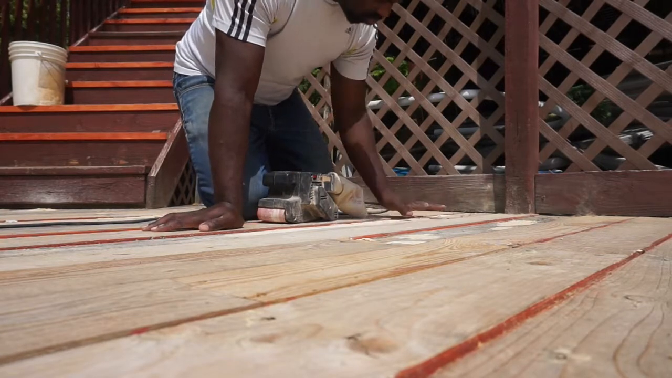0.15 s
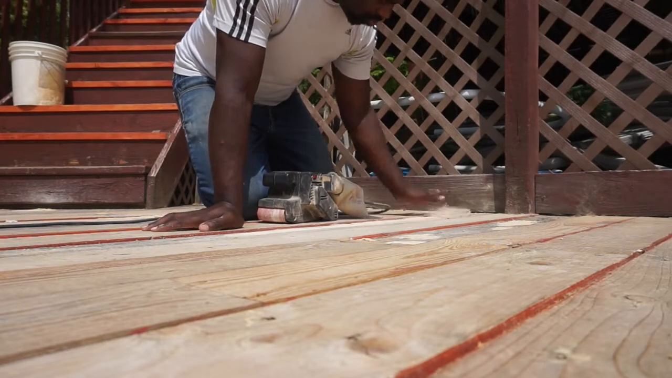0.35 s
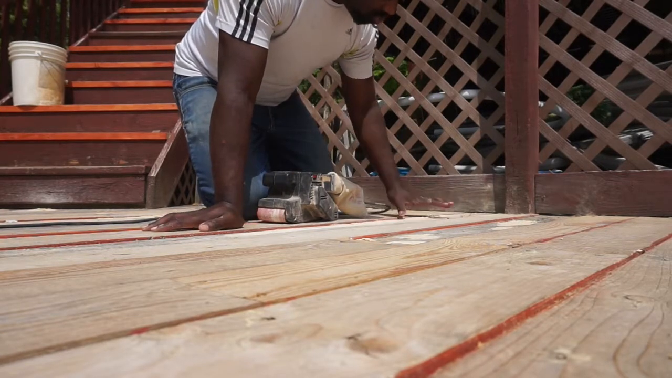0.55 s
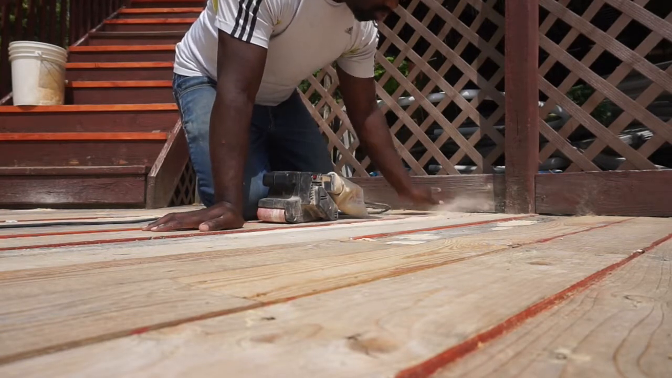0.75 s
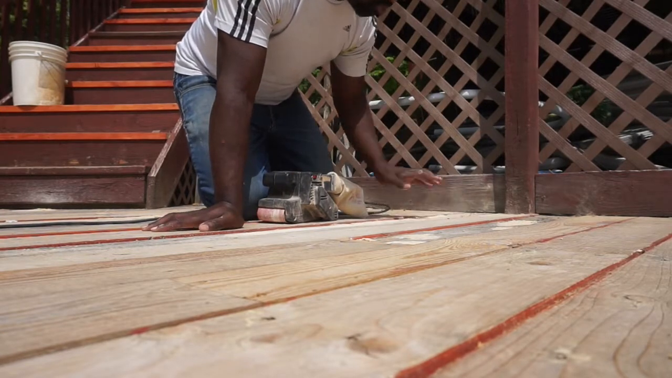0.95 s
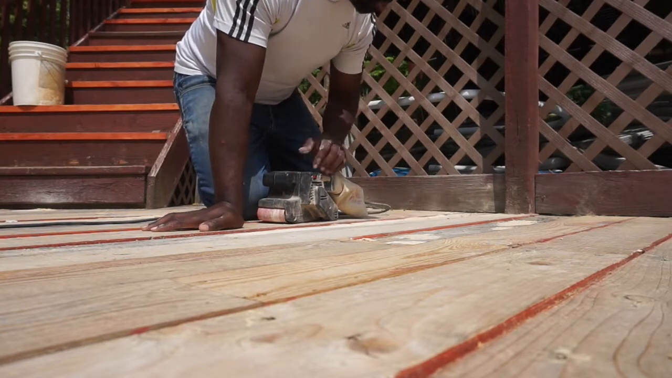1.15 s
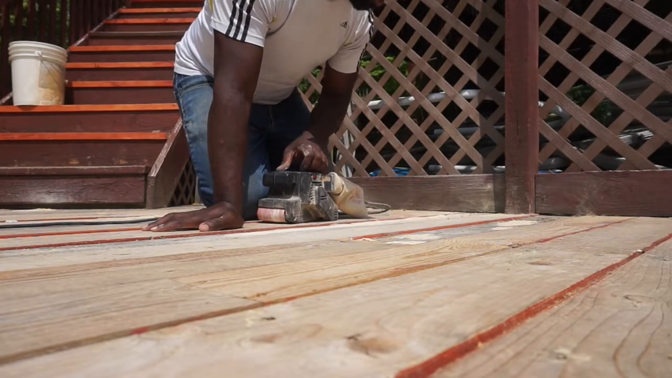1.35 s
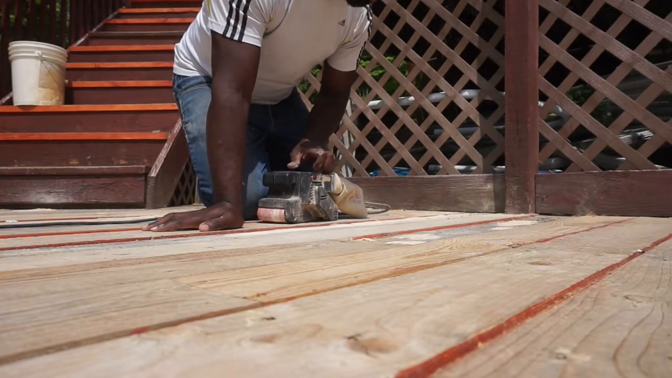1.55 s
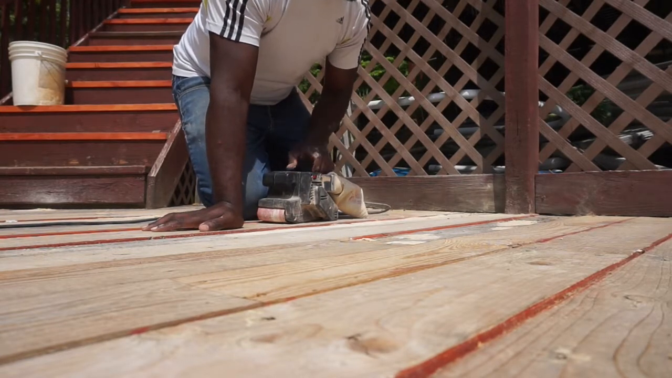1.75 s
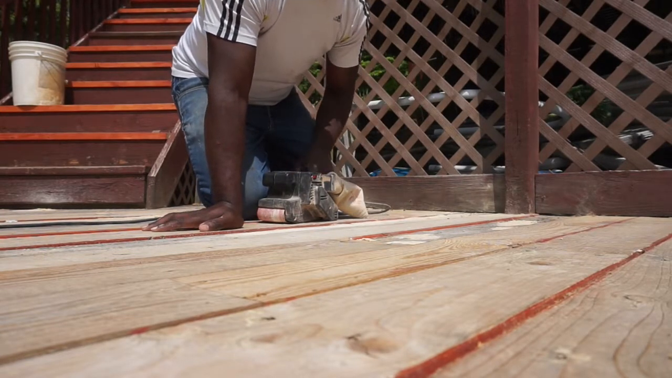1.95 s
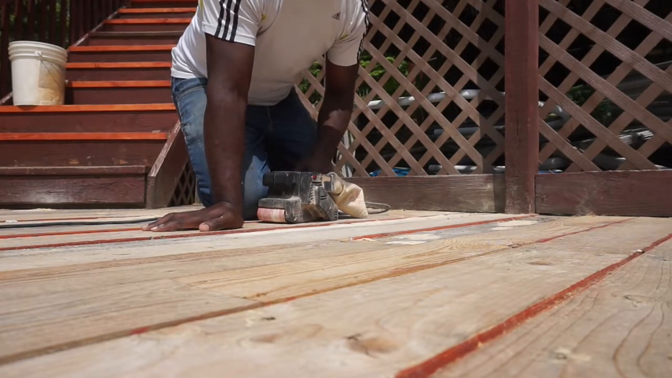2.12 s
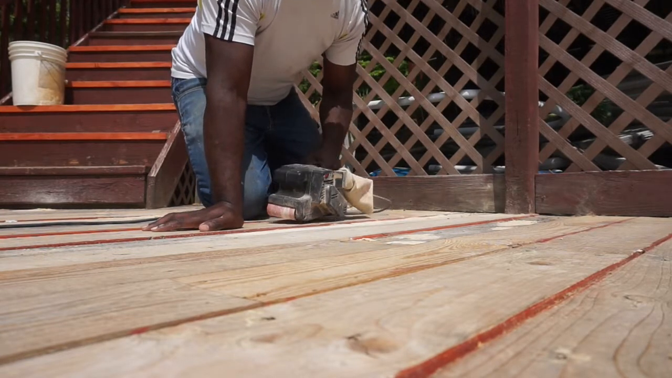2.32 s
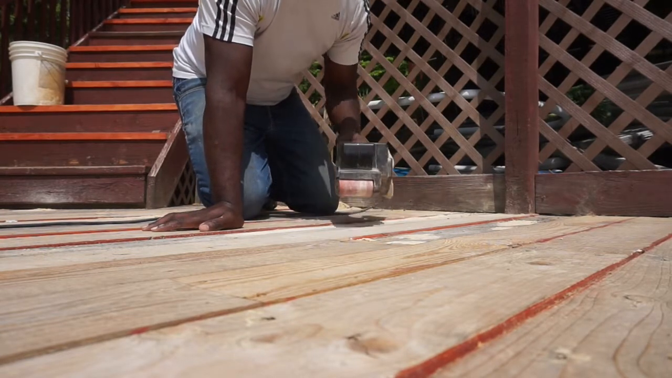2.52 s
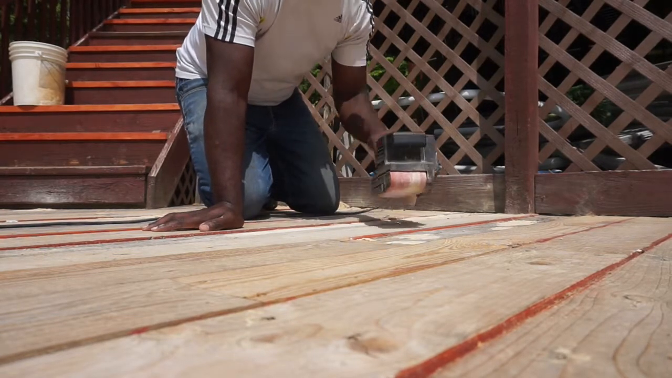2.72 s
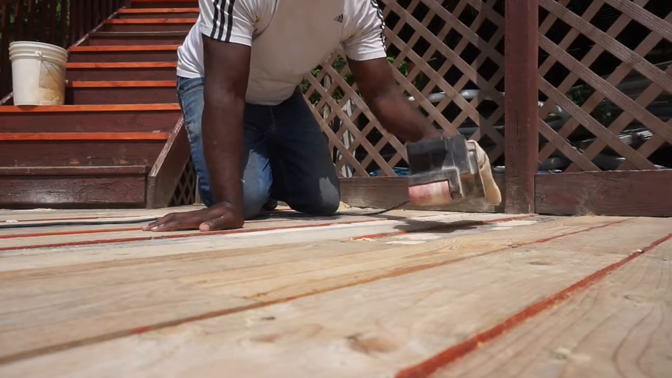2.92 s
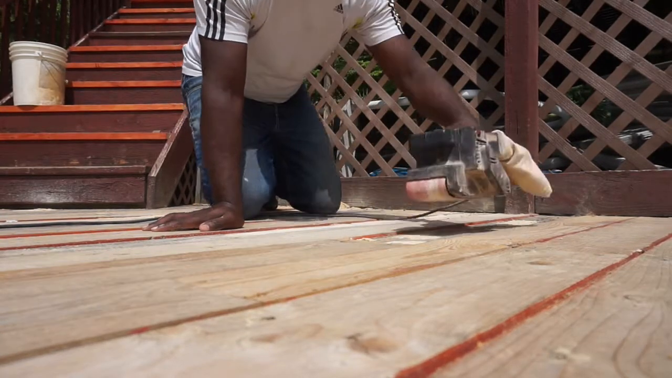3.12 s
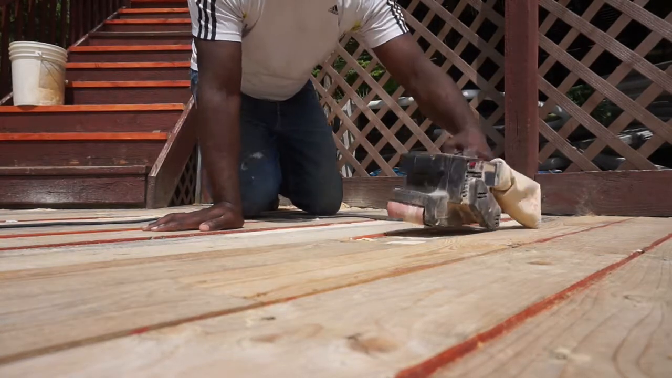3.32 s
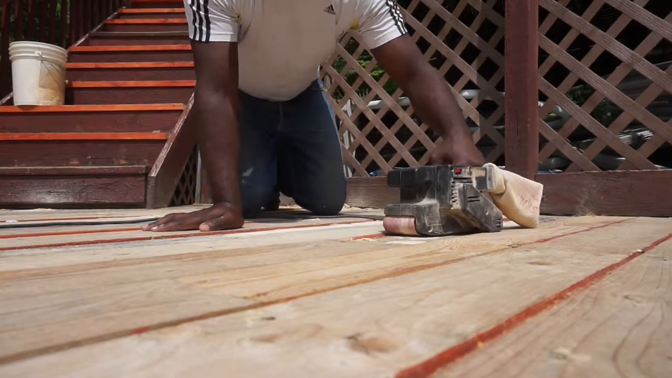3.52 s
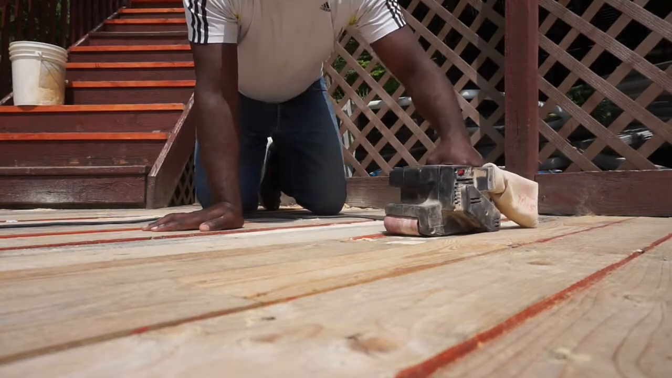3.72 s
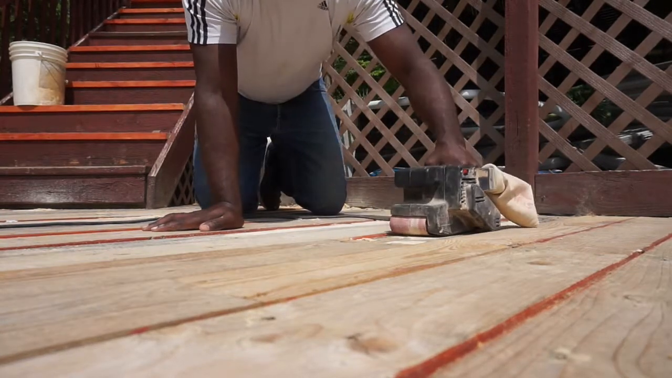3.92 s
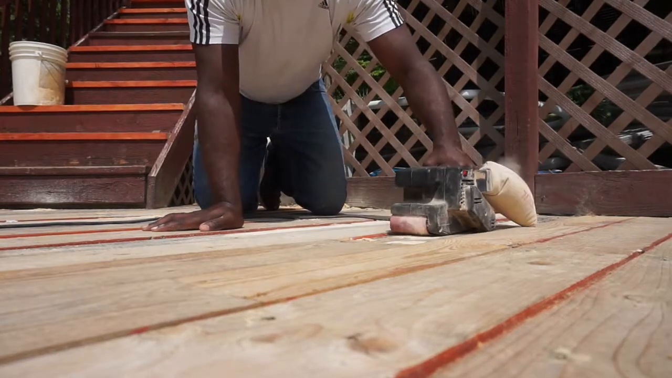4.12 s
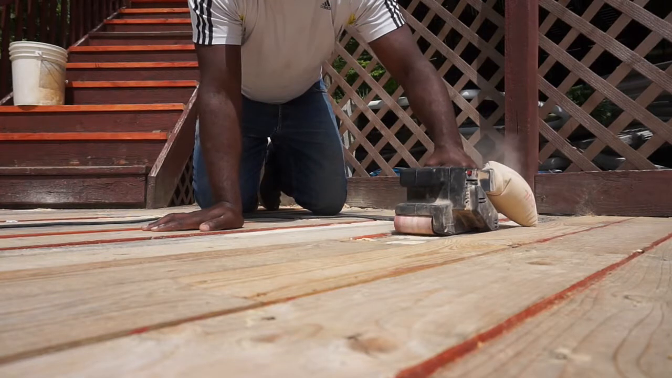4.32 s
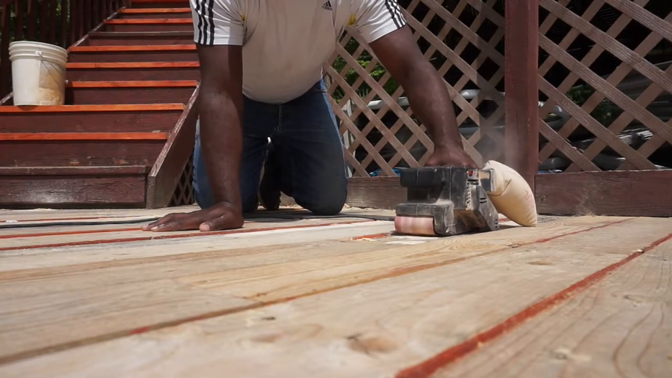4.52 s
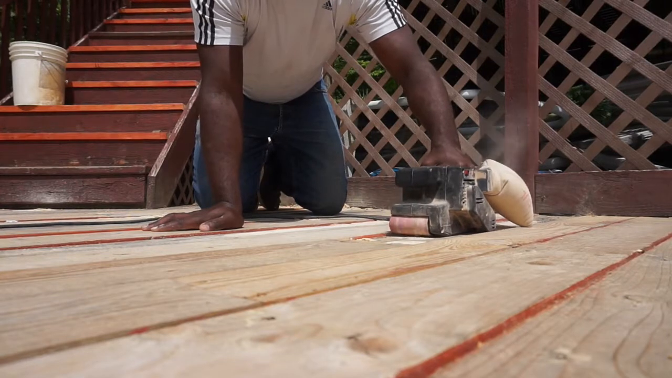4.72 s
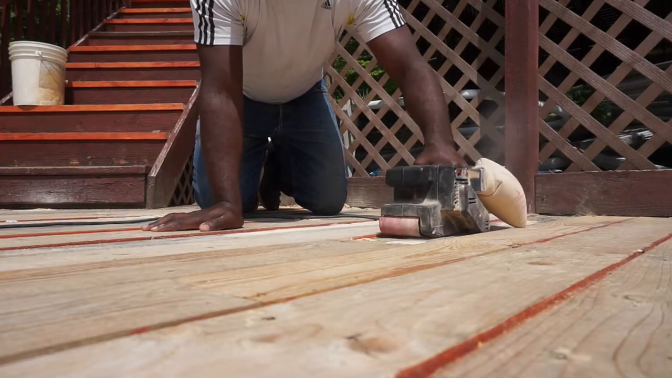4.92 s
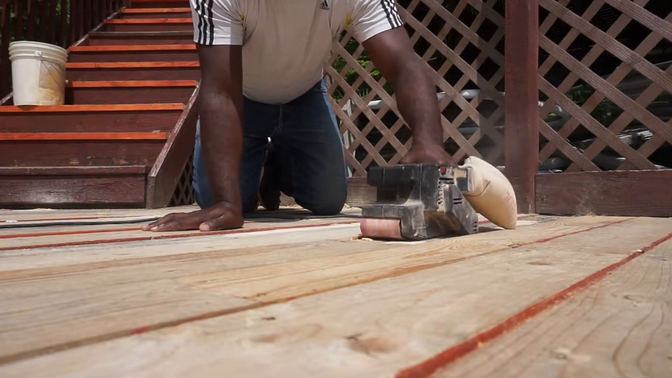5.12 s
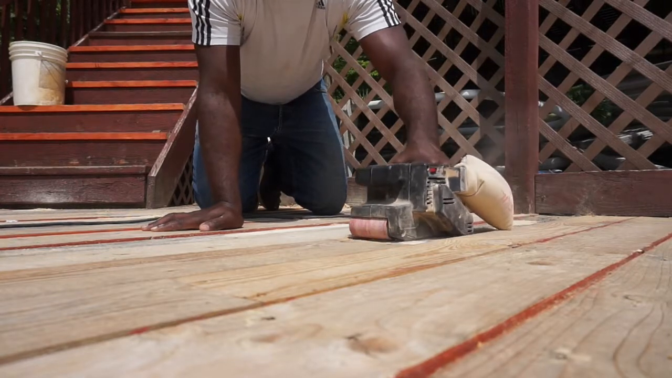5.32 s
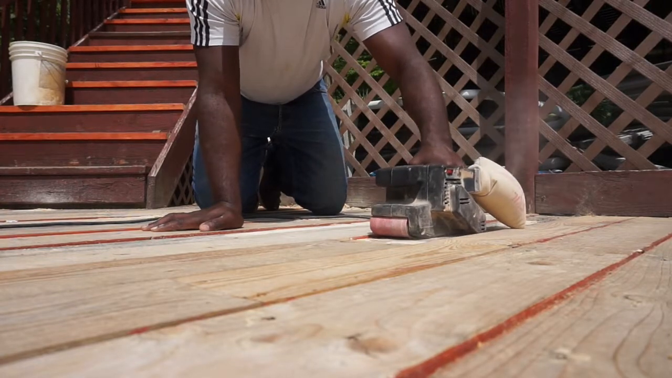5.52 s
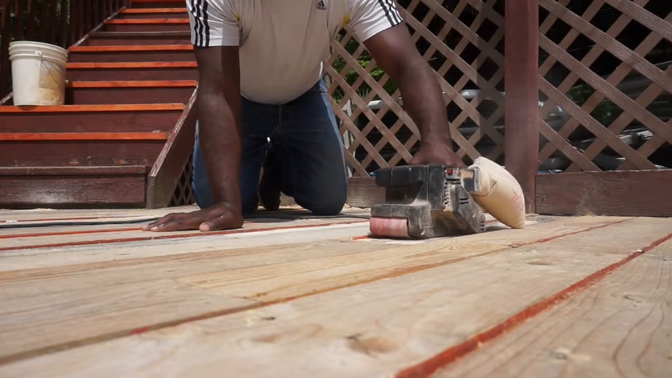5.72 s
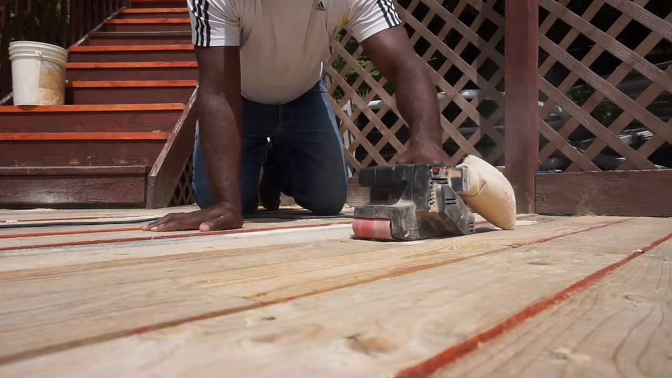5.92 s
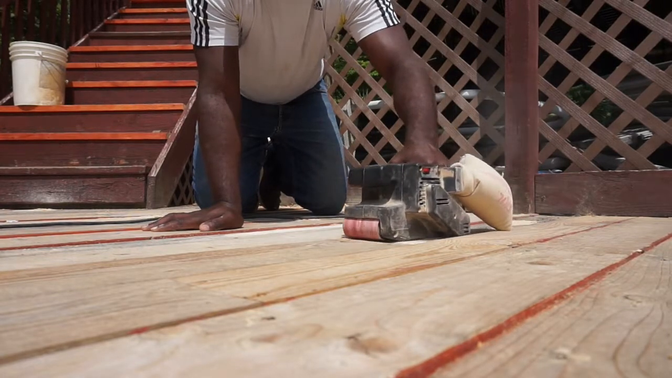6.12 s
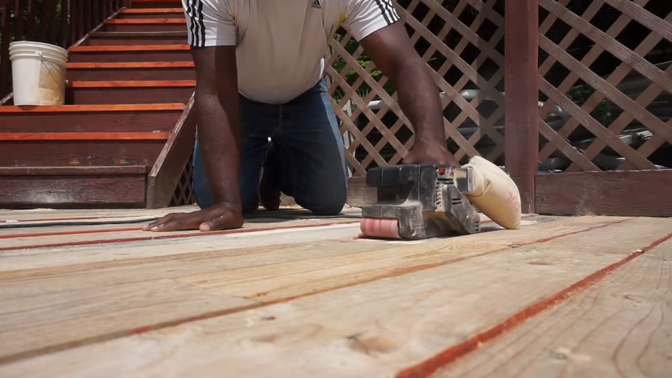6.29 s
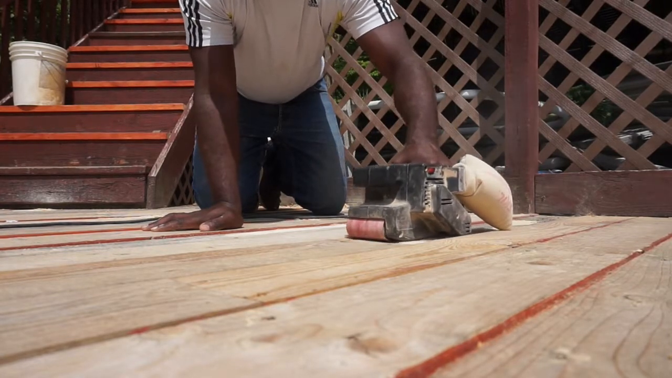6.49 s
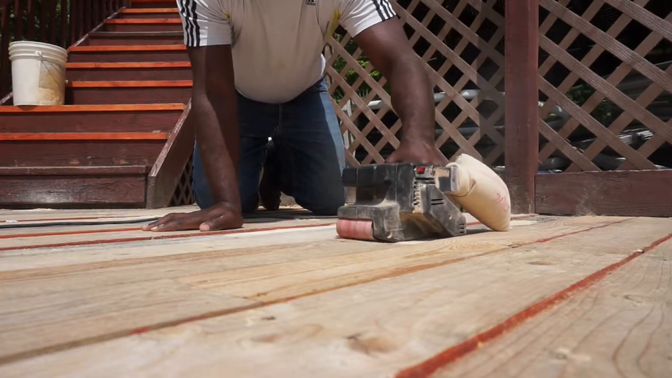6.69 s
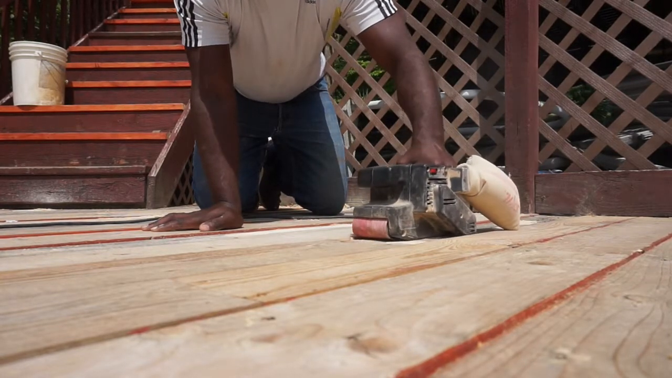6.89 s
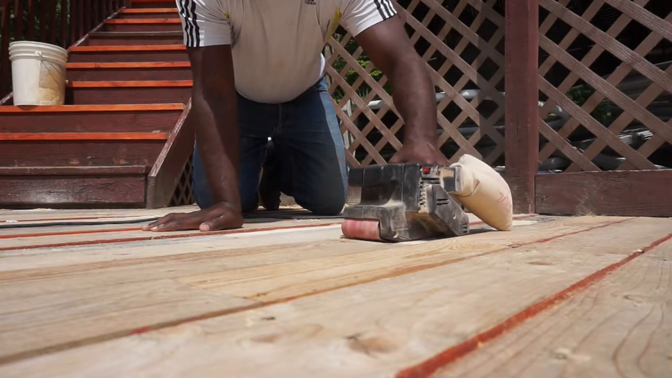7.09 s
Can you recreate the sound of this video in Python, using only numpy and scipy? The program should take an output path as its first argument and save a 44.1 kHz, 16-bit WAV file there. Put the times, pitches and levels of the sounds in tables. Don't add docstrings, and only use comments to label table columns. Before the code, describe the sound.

Cicadas drone in a yard as a hand brushes a wooden deck, a heavy tool thuds down, then a belt sander whines up and rasps.

```python
import sys
import numpy as np
from scipy import signal
from scipy.fft import rfft, irfft
from scipy.io import wavfile
from scipy.ndimage import uniform_filter1d

SR = 44100
rng = np.random.default_rng(int(sys.argv[2]) if len(sys.argv) > 2 else 0)


def put_to_file(sound):
    columns = np.atleast_2d(sound).T
    safe = np.clip(columns, -1, 1)
    whole_steps = np.round(safe * 32767)
    wavfile.write(sys.argv[1], SR, whole_steps.astype(np.int16))


def magnitude_from_level(level_db):
    exponent = np.asarray(level_db, float) / 20
    return 10 ** exponent


N = 315315
TIME, HZ = np.arange(N) / SR, np.fft.rfftfreq(N, 1 / SR)

# frequency [Hz], then likeness [0-1], phase lead [rad] or balance [dB].
YARD_SAME = [(60, .97), (300, .88), (640, .65), (1400, .5), (3100, .3), (6000, .4), (15000, .7)]
YARD_LEAD = [(30, 0), (600, .2), (1380, -.1), (3960, .7), (4820, 2.3), (6290, 2.1), (7670, .3), (15400, 0)]
YARD_PAN = [(60, -2), (240, -0.5), (950, 1), (3770, -1.5), (15000, 1.5)]
YARD_PORTS = (YARD_SAME, YARD_LEAD, YARD_PAN)
# frequency [Hz], then likeness [0-1], phase lead [rad] or balance [dB].
TOOL_SAME = [(60, .98), (500, .95), (2000, .85), (4000, .72), (8000, .5), (11000, .3), (15000, .1)]
TOOL_LEAD = [(30, 0), (2150, -.2), (2580, -.9), (3100, -3.5), (3800, -5.3), (4390, -6.4), (9470, -6.6),
             (10500, -7.1), (15400, -6.8)]
TOOL_PAN = [(60, -20), (130, 34), (290, 1.5), (640, -0.5), (1410, -6), (3100, -7), (6820, -4),
            (15000, -1.5)]
TOOL_PORTS = (TOOL_SAME, TOOL_LEAD, TOOL_PAN)
# time [s], working tooth rate [Hz], push [dB], turn [-1 to 1], lean [-1 to 1].
LOAD = [(4.3, 1267, -33.5, 0.058, -0.48), (4.6, 1279, -29.5, 0.027, 0.29),
        (4.77, 1282, -27.5, -0.013, 0.071), (4.88, 1286, -25.5, 0.12, -0.1),
        (5.0, 1274, -28.5, 0.16, -0.61), (5.18, 1256, -28.5, .4, -0.048), (5.29, 1247, -29, -0.75, 0.32),
        (5.36, 1269, -28.5, -0.18, .1), (5.46, 1250, -27, 0.17, -0.054), (5.6, 1251, -33, -0.15, 0.17),
        (5.85, 1261, -29, 0.16, 0.29), (6.09, 1251, -23.5, 0.048, 0.33), (6.27, 1243, -29.5, -0.28, 0.3),
        (6.41, 1237, -29, 0.82, 0.04), (6.58, 1245, -28.5, -0.47, -.1), (6.78, 1263, -26, -0.98, 0.48),
        (6.97, 1273, -27, -0.26, 0.17), (7.15, 1266, -22.5, 0.021, .1)]

TRIGGER_S = 4.0155


def evened(x):
    return x / np.sqrt(np.mean(np.abs(x) ** 2) + 1e-20)


def read(points, hz):
    f, value = np.transpose(points)
    return np.interp(np.log(hz + 1), np.log(f + 1), value)


def curves(rows):
    s, *columns = np.transpose(rows)
    return [np.interp(TIME, s, c) for c in columns]


def drift(hz):
    return evened(irfft(rfft(rng.standard_normal(N)) / (1 + (HZ / hz) ** 2), N))


def bump(center_s, half_s):
    return np.exp(-0.5 * ((TIME - center_s) / half_s) ** 2)


def ports(tables, hz):
    same, lead, balance_db = (read(table, hz) for table in tables)
    left = magnitude_from_level(balance_db / 2) * np.exp(0.5j * lead)
    pair = np.array([left, 1 / left])
    pair = pair * np.exp(-1j * np.angle(pair.mean(0)))
    return pair / np.maximum(abs(pair.mean(0)), 0.6), np.clip(same, 0, 1)


def grains(per_s, spread_db):
    size_db = spread_db * np.minimum(rng.exponential(1, (2, N)), 5)
    size = magnitude_from_level(size_db) * rng.standard_normal((2, N))
    return size * (rng.random((2, N)) < per_s / SR)


def spread(trains, spectrum, tables, lo_hz, hi_hz):
    pair, same = ports(tables, HZ)
    a, b = rfft(trains)
    shared = np.sqrt((1 + same) / 2) * a
    apart = np.sqrt((1 - same) / 2) * b
    inside = (HZ > spectrum[0][0]) & (HZ < spectrum[-1][0])
    z = pair * np.array([shared + apart, shared - apart]) * magnitude_from_level(read(spectrum, HZ)) * inside
    middle = irfft(z.mean(0) * (HZ > lo_hz) * (HZ < hi_hz), N)
    return irfft(z, N) / middle.std()


def ducking():
    thud_s, thud_db, recover_s, tool_db = 3.395, -11.5, 0.2, -4.5
    since_s = TIME - thud_s
    dip_db = thud_db * np.exp(-np.abs(since_s) / recover_s) * (since_s > 0)
    return uniform_filter1d(dip_db + tool_db * (TIME > TRIGGER_S), size=600)


def yard():
    # frequency [Hz], level [dB per Hz].
    high_song = [(1650, -51), (2800, -29.5), (3140, -21.5), (3920, -6), (4590, -11), (5040, -6),
                 (5810, -0.5), (7050, -13.5), (8140, -16.5), (9320, -27), (11900, -30.5), (15500, -58)]
    low_song = [(530, -30), (900, -23.5), (1060, -19.5), (1320, 1.5), (1360, 0), (1400, 0.5), (1450, -9.5),
                (1670, -24), (2000, -38.5), (2600, -46), (4400, -120)]
    deep_air = [(25, -17), (48, -8), (65, -6.5), (85, -1), (102, 0.5), (125, -9), (250, -12.5), (450, -20),
                (700, -17.5)]
    far_haze = [(300, -26), (500, -26.5), (900, 2.5), (1900, -12.5), (3000, -14), (4000, -33)]
    # time [s], swell [dB].
    swell_rows = [(0, 0), (.7, 1), (1.4, 1), (1.8, 1.5), (2.5, 2), (3.3, 3), (4, 2.5)]
    swell_db, duck_db = curves(swell_rows)[0], ducking()

    high_db = -48 + 0.94 * swell_db + duck_db + 0.2 * drift(23)
    low_db = -42 + swell_db + duck_db + 0.73 * drift(3.3)
    air_db = -59.5 + 2.9 * swell_db + duck_db + 1.6 * drift(6)
    haze_db = -62 + 1.86 * swell_db + duck_db

    high = spread(grains(9000, 0.17), high_song, YARD_PORTS, 4400, 6600) * magnitude_from_level(high_db)
    low = spread(grains(5000, 1.8), low_song, YARD_PORTS, 1240, 1640) * magnitude_from_level(low_db)
    air = spread(rng.standard_normal((2, N)), deep_air, YARD_PORTS, 40, 157) * magnitude_from_level(air_db)
    haze = spread(rng.standard_normal((2, N)), far_haze, YARD_PORTS, 480, 1140) * magnitude_from_level(haze_db)
    return high + low + air + haze


def hand():
    # time [s], level [dB], half length [s].
    sweeps = [
        (.0, -57.5, .03),
        (0.29, -55, 0.021),
        (.672, -58, 0.033),
        (1.23, -75, .015),
    ]
    # frequency [Hz], level [dB per Hz].
    dust = [(2000, -16), (3500, 0), (6000, 7), (9000, -2), (12000, -10), (15500, -21)]
    stroke = sum(magnitude_from_level(db) * bump(s, half_s) for s, db, half_s in sweeps)
    return stroke * spread(grains(7000, 2.1), dust, YARD_PORTS, 7500, 15000)


def knocks():
    # time [s], peak [dB], struck pitch [Hz], tick [dB re peak], hardness [0-1].
    blows = [(1.232, -42, 2500, -30, 0.9), (2.287, -36, 203, -35, 0.3), (2.958, -41, 169.6, -35, 0.6),
             (3.206, -37.5, 84, -50, 0.15), (3.3925, -14, 700, -45, 0.49), (3.4112, -16, 1140, -35, 0.58),
             (3.418, -22, 188, -45, 0.23), (3.44, -29, 1300, -24, 0.9), (3.455, -23.5, 710, -13, 0.53),
             (3.476, -27.5, 447, -40, .35), (3.837, -51, 1300, -30, 1), (4.016, -21.5, 756, -35, 1),
             (4.034, -16.5, 1075, -35, 0.83), (4.051, -31, 910, -30, 0.7), (4.083, -28.5, 224, -30, 0.43),
             (5.294, -27, 123, -17, 0.5), (5.339, -27, 315, -20, 0.57), (5.57, -42, 497, -15, 0.6)]
    # frequency [Hz], level [dB], decay by 60 dB [s].
    deck = [(67.7, -10, 0.26), (95, -2, 0.13), (135, -2.5, 0.16), (217, -5, 0.17), (248, -6, 0.24),
            (335, -7.5, 0.12), (422, -12, 0.3), (509, -13, 0.28), (655, -31, 0.042), (796, -1, 0.05),
            (968, 1, 0.021), (1300, -6, 0.053), (1643, -3, 0.012), (2390, -16, 0.016)]
    t, out = np.arange(SR // 3) / SR, np.zeros(N + SR)
    contact = 1 - np.exp(-t / 0.00036)
    tick_band = signal.butter(4, [6500, 12000], "band", fs=SR)
    wood_band = signal.butter(3, [600, 3000], "band", fs=SR)
    for s, db, hz, tick_db, hard in blows:
        boards = np.zeros(len(t))
        for f, mode_db, t60_s in deck:
            level_chance, pitch_chance, phase_chance = rng.uniform(-1.41, 1, 3)
            hard_db = 20 * (hard - 0.5) * np.log2(f / 300)
            decay_db = mode_db + hard_db + 4.6 * level_chance - 60 * t / t60_s
            phase = 2 * np.pi * f * (1 + 0.077 * pitch_chance) * t + 2.1 * phase_chance
            boards += magnitude_from_level(decay_db) * np.sin(phase)
        struck = 0.85 * magnitude_from_level(-60 * t * hz / 19.5) * np.sin(2 * np.pi * hz * t)
        ring = contact * (boards / abs(boards).max() + struck)
        tick = signal.lfilter(*tick_band, rng.standard_normal(len(t))) * magnitude_from_level(tick_db - 60 * t / 0.016)
        crack = signal.lfilter(*wood_band, rng.standard_normal(len(t)))
        crack = crack * hard ** 2 * magnitude_from_level(-5 - 60 * t / 0.056)
        out[round(s * SR):][:len(t)] += magnitude_from_level(db) * (ring / abs(ring).max() + tick + crack)
    return signal.lfilter(*signal.butter(2, 55, "high", fs=SR), out[:N])


def lattice(x):
    taps = np.zeros((2, 2000))
    at = rng.integers(60, 2000, (2, 40))
    echoes = rng.choice([-1.0, 1.0], at.shape) * magnitude_from_level(-60 * at / SR / 0.09)
    np.put_along_axis(taps, at, echoes, 1)
    return signal.fftconvolve(x[None], taps / np.linalg.norm(taps[0]), axes=1)[:, :N]


def speed():
    start_s, spin_up_s = 3.998, 0.118
    slack = np.exp(-np.maximum(TIME - start_s, 0) / spin_up_s)
    return uniform_filter1d(curves(LOAD)[0], size=400) * (1 - slack), slack


def seams():
    # time [s], contact [dB], half length [s].
    crossings = [
        (4.147, -5, 0.01),
        (4.211, -8, 0.018),
        (4.324, 4.5, 0.018),
        (4.45, 3, .03),
        (4.794, -4, 0.11),
        (5.3, 4.5, 0.022),
        (5.508, -1, 0.027),
        (5.586, 5.5, 0.037),
        (6.407, 2.5, 0.014),
        (7.1, -5, 0.17),
    ]
    return sum(db * bump(s, half_s) for s, db, half_s in crossings)


def rasp():
    # frequency [Hz], level [dB per Hz].
    board_boom = [(110, -56), (200, -32), (300, -8.5), (500, -5.5), (800, -0.5), (1100, 0.5), (1400, 6),
                  (2000, -13.5), (2600, -62)]
    grit_hiss = [(1500, -6), (2100, -3.5), (3000, -5), (4200, 0.5), (5500, -5), (8000, -7), (11000, -7),
                 (12500, -14), (14000, -16), (16000, -21)]
    rate_hz, slack = speed()
    grab_db = 6 * np.exp(-np.abs(TIME - TRIGGER_S) / 0.11)
    contact_db = grab_db + seams()
    teeth = 1 + 0.076 * np.cos(2 * np.pi * np.cumsum(rate_hz) / SR)
    press = drift(15)
    board_db = -39 + contact_db + 0.29 * press
    hiss_db = -47 - 11.5 * slack + 0.55 * contact_db + 0.8 * press
    board = spread(grains(6000, 2.6), board_boom, TOOL_PORTS, 350, 1307) * magnitude_from_level(board_db)
    grit = spread(grains(18000, 2.2) * teeth, grit_hiss, TOOL_PORTS, 6600, 7320) * magnitude_from_level(hiss_db)
    return board + grit


def drive():
    # multiple of tooth rate, level [dB re housing].
    upper_teeth = [(9, 2), (10, -4), (11, -7), (12, -8)]
    shafts = list(zip((.206, 1.2, 1.8, 3.6, 8.4, .4, .5), (0.1, -8, -11, -17, -5, -12, -13)))
    # frequency [Hz], level [dB].
    housing = [(150, -97), (255, -57.5), (2000, -47.5), (3300, -76), (4300, -30.5), (5800, -36),
               (7500, -52.5), (8800, -38), (10000, -48), (11300, -59), (12600, -67), (14000, -80)]
    main_lines = list(zip((1, 2, 3, 4, 5, 6, 7, 8, .3, 9.6),
                  (-28, -32, -35, -36.5, -37.5, -48, -50, -46, -44, -45),
                  (.95, .1, .1, -.2, -.2, .3, .1, -.3, .4, .1),
                  (.1, 1.1, -5, 6, 2.5, -1.1, -1.1, 3, -1.1, .1),
                  (.1, .6, -1.1, 1.1, .5, -8, 4, -4, -1.1, 8),
                  (-13, 3, -15, -10, -12, -1.5, -1.5, -5, -34, -25)))
    # frequency [Hz], width [Hz], gain [dB].
    rings = [(700, 67, -4), (1023, 163, 7), (1386, 112, 8), (2120, 42, -19), (3280, 160, -10.5),
             (3684, 61, -9.5), (4140, 270, 12), (4620, 100, 5.5), (5380, 280, -9), (7180, 100, 10)]
    push_mean_db, mesh_db = -25.5, -22

    rate_hz, slack = speed()
    _, push_db, turn, lean = curves(LOAD)
    rate_hz = rate_hz * (1 + 0.001215 * drift(17.2))
    turns = 2 * np.pi * np.cumsum(rate_hz) / SR
    modes_db = 2.8 * evened(uniform_filter1d(rng.standard_normal(len(HZ)), size=1500))
    lift_db = 0.22 * np.minimum(seams(), 0)
    jolt_db = -14.5 * bump(5.33, 0.013)

    lines = []
    for k, db, share, turn_db, lean_db, slack_db in main_lines:
        hz = k * rate_hz
        load_db = share * (1 - slack) * (push_db - push_mean_db) + turn_db * turn + lean_db * lean
        waver_db = 1.5 * k ** 0.34 * drift(6.4)
        start_db = mesh_db * slack ** 4 + slack_db * slack + 1.8 * np.sqrt(slack) * np.interp(hz, HZ, modes_db)
        ring_db = sum(d / (1 + (2 * (hz - f) / w) ** 2) for f, w, d in rings)
        lines.append((k, db + load_db + waver_db + start_db + lift_db + ring_db))
    for k, db in upper_teeth + shafts:
        hz = k * rate_hz
        body_db = read(housing, hz) + np.interp(hz, HZ, modes_db)
        lines.append((k, db + body_db - 16 * slack + 3.2 * drift(4)))

    out = np.zeros((2, N))
    for k, db in lines:
        wobble = np.cos(turns / 8 + 2 * np.pi * rng.random())
        pulley = 0.24 * np.exp(1j * (1.8 * drift(6))) * wobble
        sway = drift(9) + 1j * drift(9)
        blur = drift(200) + 1j * drift(200)
        flutter = 0.11 * sway + (0.13 + 0.55 * slack) * blur
        level = np.sqrt(2) * magnitude_from_level(db + jolt_db * (k > 2.5))
        line = -level * (1 + pulley + flutter) * np.exp(1j * k * turns)
        tilt = magnitude_from_level(0.79 * drift(1.7) * np.array([[1], [-1]]))
        out += (ports(TOOL_PORTS, k * rate_hz)[0] * tilt * line).real
    return out


def scene():
    blows = knocks()
    running = np.clip((TIME - TRIGGER_S) / 0.0017, 0, 1)
    return yard() + hand() + blows + magnitude_from_level(-13) * lattice(blows) + running * (drive() + rasp())


def low_pass(x):
    return signal.sosfilt(signal.butter(12, 15890, fs=SR, output="sos"), x)


def record(dry):
    band = signal.firwin(301, 15760, window=("kaiser", 9), fs=SR)
    return low_pass(signal.oaconvolve(dry, band[None], "same"))


dry = scene()
out = record(dry)
put_to_file(out)
```